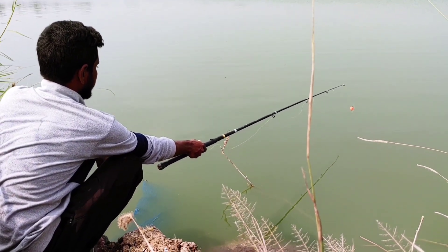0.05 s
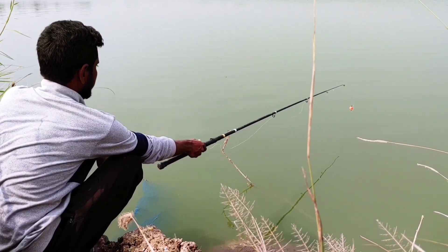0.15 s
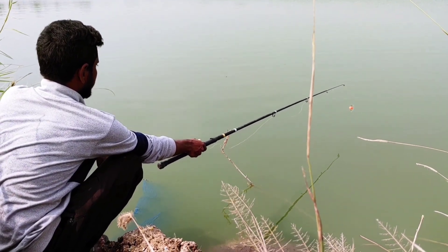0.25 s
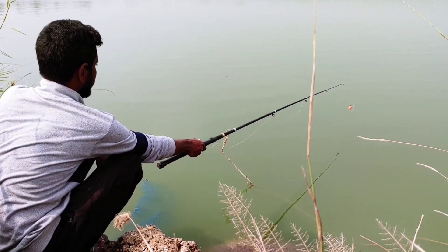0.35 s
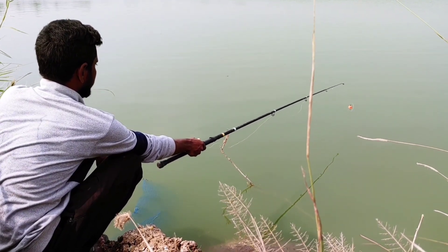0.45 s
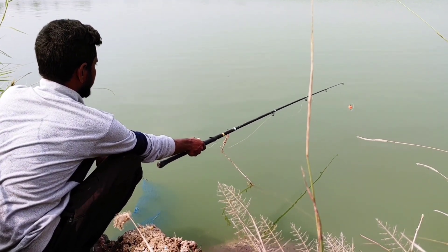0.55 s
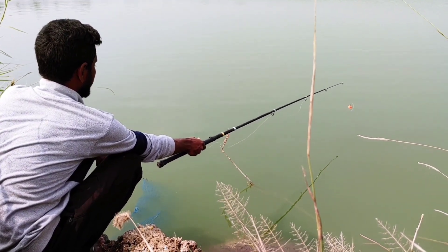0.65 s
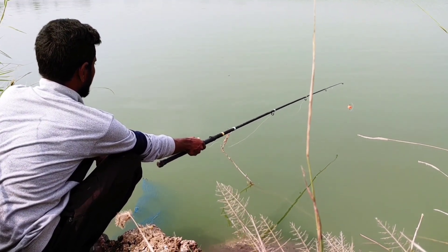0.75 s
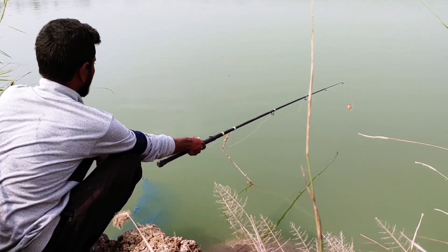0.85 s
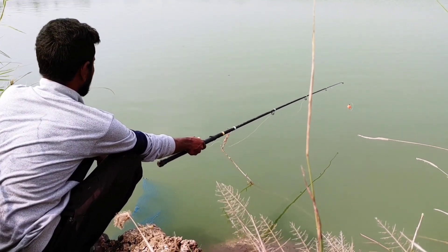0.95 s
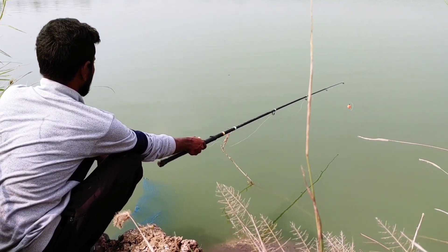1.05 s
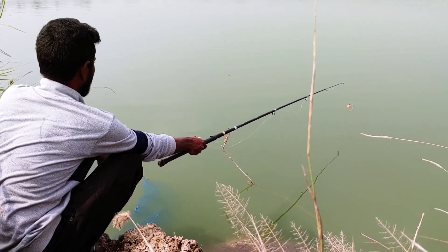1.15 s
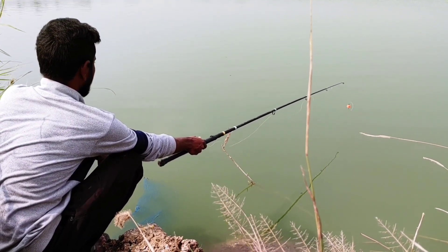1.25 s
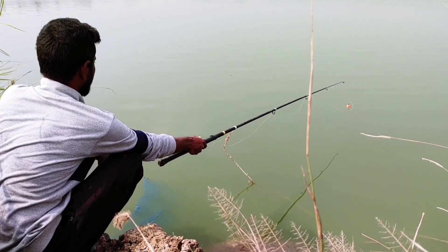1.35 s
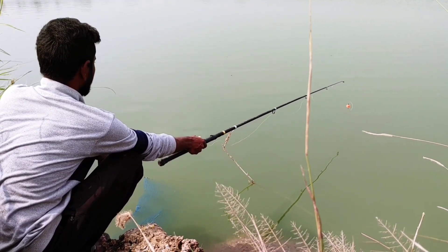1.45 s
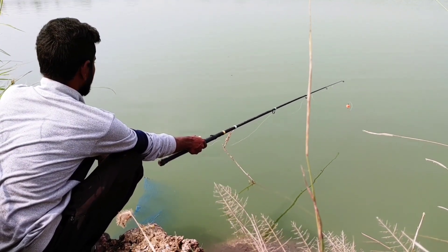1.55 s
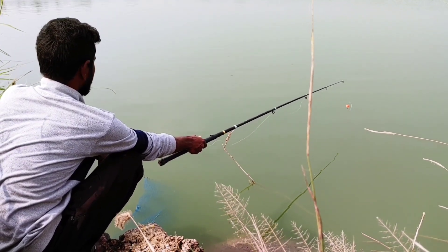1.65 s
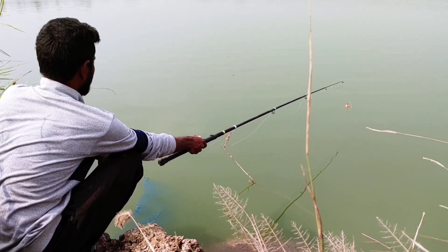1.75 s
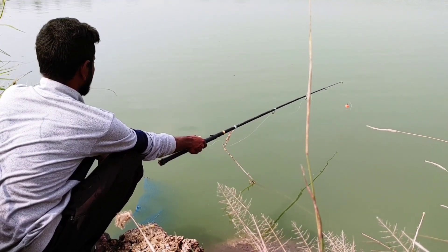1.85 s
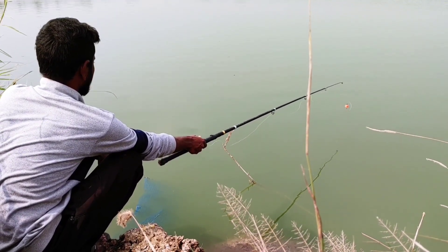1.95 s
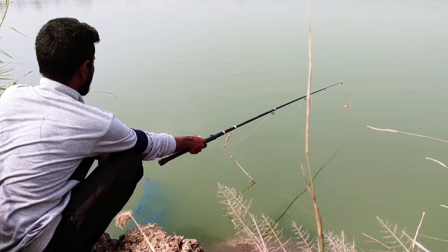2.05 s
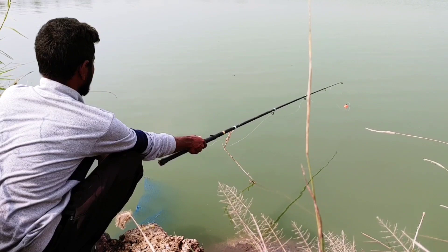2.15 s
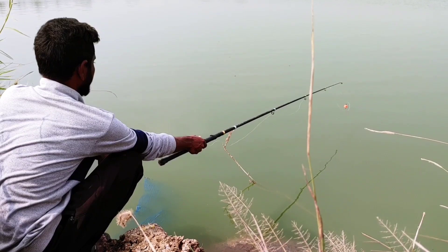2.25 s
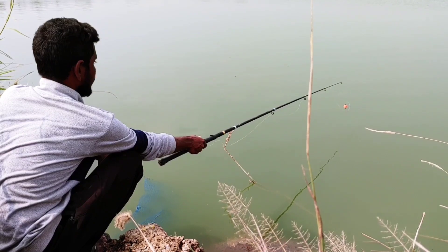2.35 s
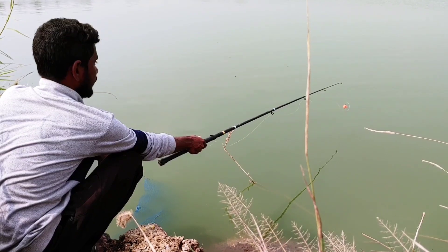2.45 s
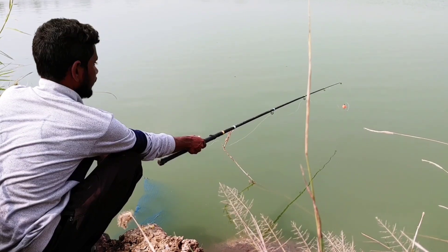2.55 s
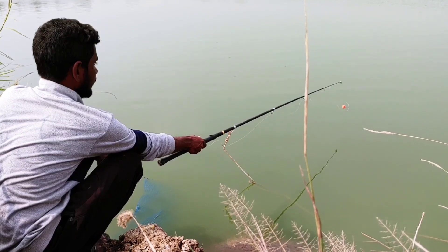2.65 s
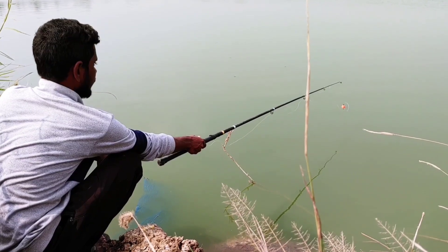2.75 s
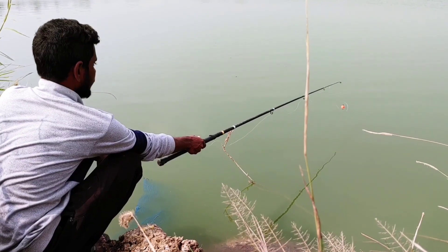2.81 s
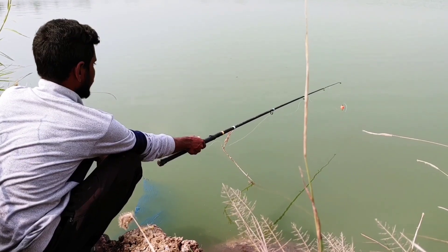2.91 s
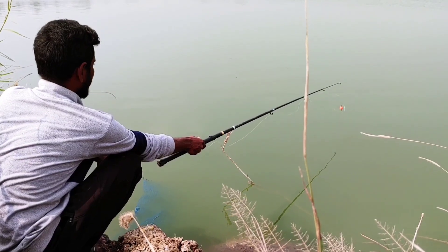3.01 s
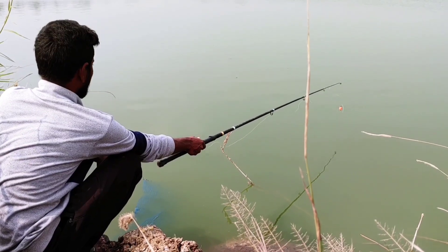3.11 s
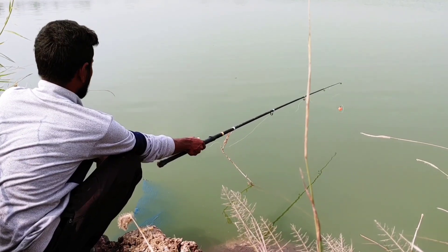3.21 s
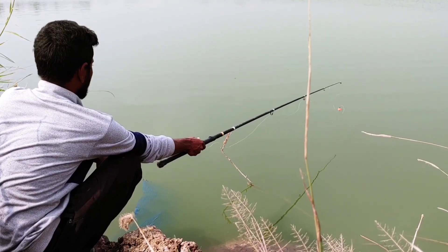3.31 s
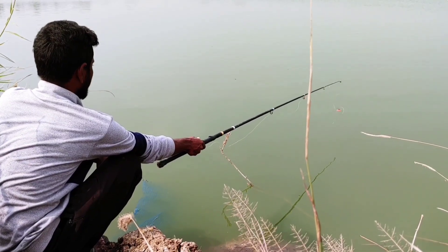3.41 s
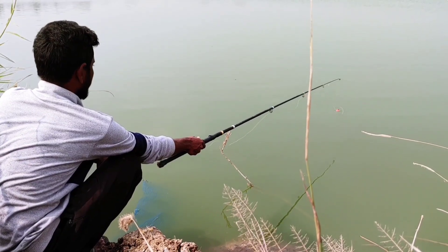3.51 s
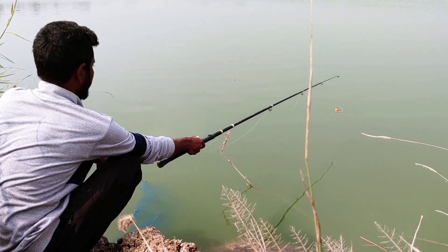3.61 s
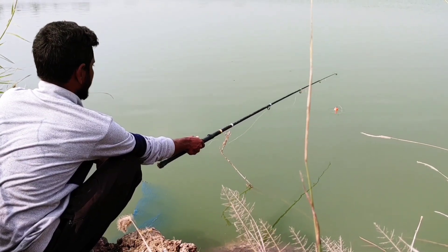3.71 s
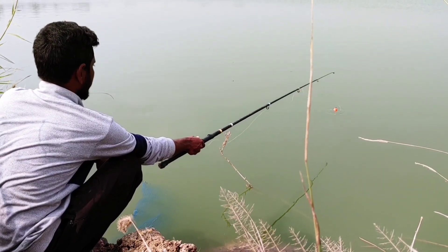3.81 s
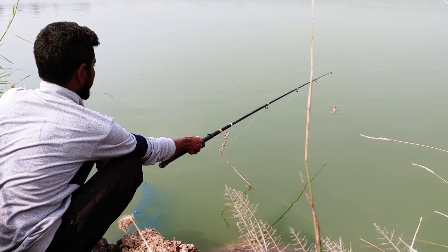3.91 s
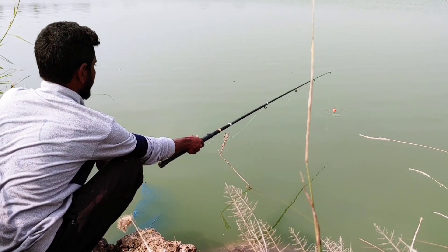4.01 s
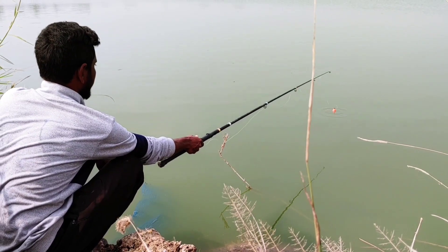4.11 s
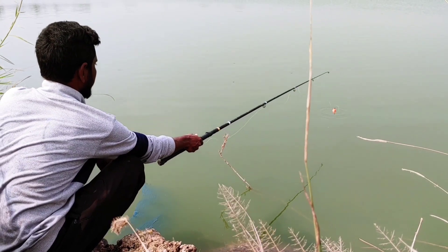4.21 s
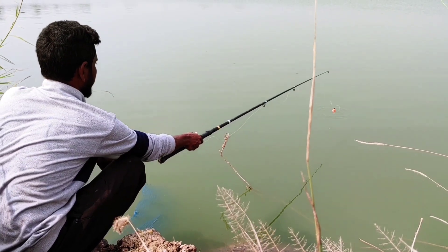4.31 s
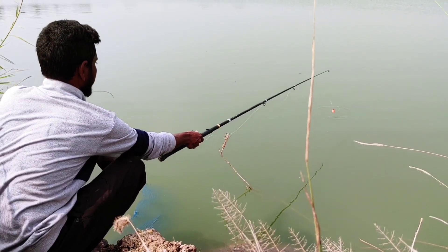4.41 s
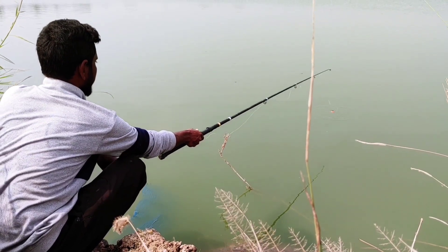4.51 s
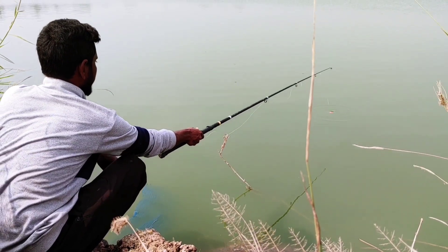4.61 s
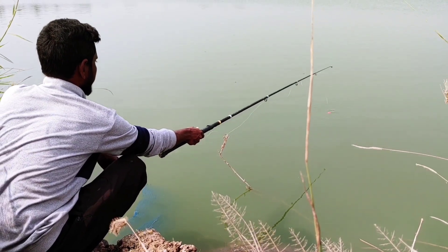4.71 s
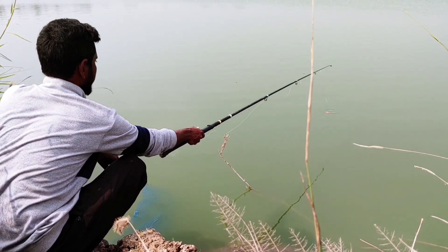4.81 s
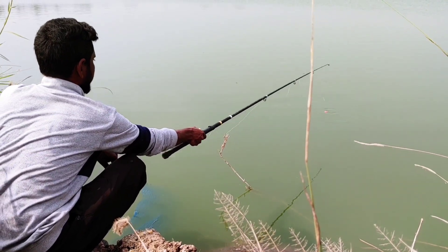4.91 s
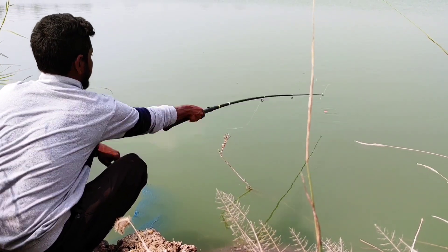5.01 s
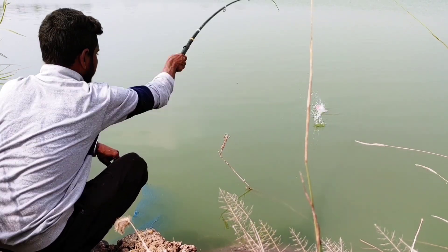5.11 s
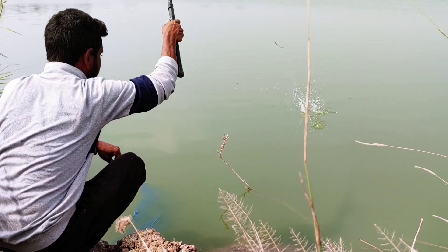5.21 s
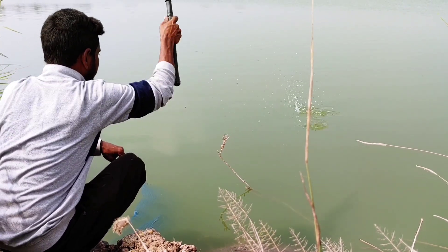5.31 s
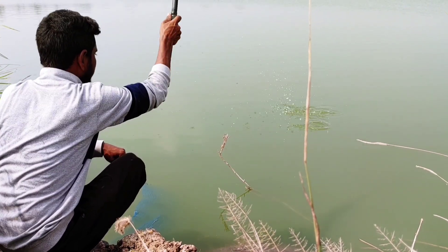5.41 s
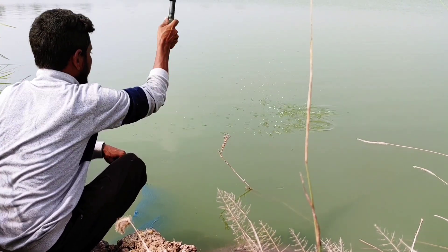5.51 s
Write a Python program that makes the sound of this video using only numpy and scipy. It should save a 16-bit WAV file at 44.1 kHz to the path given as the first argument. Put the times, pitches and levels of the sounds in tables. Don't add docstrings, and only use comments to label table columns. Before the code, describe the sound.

Calm lake edge with low distant rumble, a faint motor hum, soft air hiss and thin bird twitter. Near the bank water slaps sharply, then sloshes again, throwing plinking drops. After the drips thin out, a hooked fish thrashes with loud, crackling spray. Small stereo recorder close to the water, open air, little echo.

```python
import sys
import numpy as np
from scipy import signal
from scipy.fft import rfft, irfft, next_fast_len
from scipy.io import wavfile
from scipy.ndimage import uniform_filter1d, map_coordinates

SR = 44100
rng = np.random.default_rng(int(sys.argv[2]) if len(sys.argv) > 2 else 0)


def elevation(decibels):
    levels = np.asarray(decibels, float)
    return 10 ** (levels / 20)


def master(y):
    cut = np.clip(np.atleast_2d(y).T, -1, 1)
    pcm = np.round(cut * 32767)
    wavfile.write(sys.argv[1], SR, pcm.astype(np.int16))


N = 245240
T = np.arange(N) / SR


def unit(x):
    return x / np.sqrt(np.mean(x ** 2) + 1e-20)


def along(points, hz):
    f, v = np.transpose(points)
    return np.interp(np.log(hz + 1), np.log(f + 1), v)


def filtered(x, response):
    size = next_fast_len(N + 8192)
    return irfft(rfft(x, size) * response(np.fft.rfftfreq(size, 1 / SR)), size)[..., :N]


def equalised(x, points):
    return filtered(x, lambda f: elevation(along(points, f)))


def causal(points):
    cepstrum = irfft(np.log(elevation(along(points, np.fft.rfftfreq(1024, 1 / SR)))))
    cepstrum[1:512] *= 2
    cepstrum[513:] = 0
    return irfft(np.exp(rfft(cepstrum)))[:512]


def wobble(rate):
    knots = rng.standard_normal(int(N * 40 / SR) + 4)
    return map_coordinates(knots, [T * np.clip(rate, 0, 40)])


def rings(s, hz, size, rise, life, attack, length):
    s, hz, size, rise, life = (np.broadcast_to(v, np.shape(s))[:, None] for v in (s, hz, size, rise, life))
    k = np.arange(length)
    age = k / SR / life
    turns = hz * life * (age + (rise - 1) * age * age / 2)
    envelope = size * elevation(-20 * age) * (1 - np.exp(-age / attack)) * np.clip(4 - 1.6 * age, 0, 1)
    wave = envelope * np.sin(2 * np.pi * turns)
    at = np.clip(np.round(s * SR).astype(int) + k, 0, N)
    return np.bincount(at.ravel(), wave.ravel(), N + 1)[:N]


def far_rumble():
    # frequency [Hz], density [dB per Hz].
    rumble_colour = [(15, -37), (30, -14.5), (60, -4), (100, -1.5), (145, -3.5), (185, -3.5), (240, -13),
                     (400, -28.5), (700, -21.5), (1000, -45)]
    a, b = rng.standard_normal((2, N))
    rumble = equalised(np.array([a + 0.028 * b, a - 0.14 * b]), rumble_colour)
    return elevation(-57.5 + 0.3 * wobble(3.3)) * unit(rumble)


def far_pump():
    hz = 145 + 2.1 * wobble(3.7)
    return elevation(-60 + 0.18 * wobble(1.2)) * np.sin(2 * np.pi * np.cumsum(hz) / SR)


def air_hiss():
    # frequency [Hz], density [dB per Hz].
    left_hiss = [(150, -9), (300, 1.5), (700, -6), (2000, -10.5), (2700, -17), (3600, -13.5), (5300, -20),
                 (6200, -19), (7300, -31), (8300, -22.5), (9500, -20), (11700, -19.5), (15200, -17.5),
                 (16300, -50)]
    right_hiss = [(150, 3.5), (300, -1), (700, -1.5), (2000, -12), (2700, -10.5), (3600, -13.5),
                  (5000, -13.5), (6700, -18), (7400, -29), (8300, -24.5), (10200, -11.5), (12500, -17.5),
                  (15200, -17), (16300, -60)]
    a, b = rng.standard_normal((2, N))
    both = np.array([a + 0.95 * b, a - 1.05 * b])
    hiss = filtered(both, lambda f: elevation([along(left_hiss, f), along(right_hiss, f)]))
    return elevation(-59.5 + 0.7 * wobble(2.6)) * unit(hiss)


def background():
    return far_rumble() + far_pump() + air_hiss()


def bird():
    # start [s], pitch [Hz].
    bird_notes = [(.075, 2520), (.13, 2820), (.165, 2690), (.295, 2820), (.33, 2620), (.43, 2470),
                  (.525, 2820), (.81, 2820), (.63, 2780), (.625, 2450), (.38, 2500), (.49, 2880),
                  (.225, 2900), (.36, 2650), (.55, 2850), (.73, 2850), (.93, 2800), (.95, 2600), (.6, 2440),
                  (.68, 2650), (.2, 2920), (.885, 2450), (.905, 2450), (.98, 2800)]
    # start [s], pitch [Hz], peak [dB], life [s], glide [share of pitch].
    whistles = [
        (1.775, 3690, -67, .079, 0),
        (4.09, 1440, -73, .27, 0),
        (2.292, 2050, -54, .04, -.08),
        (2.52, 2020, -61, .06, -.08),
    ]
    note_db, note_s = -71, 0.033
    luck = rng.uniform(0, 1, (3, 140))
    twitter_hz = 2400 + 600 * luck[1]
    song = rings(0.074 + luck[0], twitter_hz, elevation(-64.5), 0.76 + 0.235 * luck[2], 0.0113, 0.24, 1200)
    warble = np.cumsum(1 + 0.012 * wobble(40)) / SR
    for s, hz, db, life, glide in [(s, hz, note_db, note_s, 0) for s, hz in bird_notes] + whistles:
        envelope = np.sin(np.pi * np.clip((T - s) / life, 0, 1)) ** 0.11
        turns = hz * (warble + glide * (T - s) ** 2 / life / 2)
        song += elevation(db) * envelope * np.sin(2 * np.pi * turns)
    song *= elevation(3 * wobble(38))
    t = np.arange(SR // 4) / SR
    haze = rng.standard_normal((2, len(t))) * elevation(-60 * t / 0.1)
    far = signal.fftconvolve(song[None], haze / np.linalg.norm(haze[0]), axes=1)[:, :N]
    return (song + elevation(-3) * far) * elevation([[-4], [3]])


def grains(count, hz, spread, cycles, uneven_db, length, noise):
    out = []
    for _ in range(2):
        pitch = np.clip(hz * np.exp(spread * rng.standard_normal(count)), 120, 15000)
        size = elevation(uneven_db * np.minimum(rng.exponential(1, count), 3)) * rng.choice([-1, 1], count)
        shower = rings(rng.uniform(0, N / SR, count), pitch, size, 1.183, cycles / pitch, 0.071, length)
        hiss = filtered(rng.standard_normal(N), lambda f: np.exp(-(np.log((f + 1) / hz) / spread / 2) ** 2))
        out.append(unit(unit(shower) + noise * unit(hiss)))
    return np.array(out)


def churn(rows, swell, water, trim_db):
    s, db, hold, depth = np.transpose(rows)[:, :, None]
    rise, fall = swell
    shape_db = db - rise * np.maximum(s - T, 0) - fall * np.maximum(T - s - hold, 0)
    depth_shares = (0, 0.48, 1)
    shared_db = 2.46 * wobble(39)
    out = 0
    for layer, share, trim in zip(water, depth_shares, trim_db):
        level = np.sqrt(elevation(2 * (shape_db + share * depth)).sum(0))
        out = out + layer * level * elevation(trim + shared_db + 1.7 * wobble(25))
    return out


def drops(rows, water, ring_hz, lighter_higher, tick_db, ring_db, spatter_db, body_db):
    spray, chatter, _ = water
    s, db, body, t60 = np.transpose(rows)
    hz = ring_hz * np.exp(0.061 * rng.standard_normal(len(s)) - lighter_higher * body)
    ring = rings(s, hz, elevation(db + ring_db), 1.007, 12 / hz, 0.64, 300)
    tick = elevation(db + tick_db) * np.minimum(0.031 / t60, 1)
    ring += rings(s, 9300, tick, 1.3, 0.0002, 0.083, 60)
    lead = SR // 50
    t = np.arange(-lead, SR // 4) / SR - 0.0012
    fine, coarse = np.zeros(N + SR), np.zeros(N + SR)
    for at, level, low, decay in zip(s, db, body, t60):
        shape = elevation(-60 * np.abs(t) / max(decay, 0.003) / np.where(t < 0, 0.25, 1))
        span = slice(round(at * SR) - lead, round(at * SR) - lead + len(t))
        fine[span] += elevation(2 * (level + spatter_db)) * shape ** 2
        coarse[span] += elevation(2 * (level + low + body_db)) * shape
    return ring * np.c_[[1, 0.4]] + spray * np.sqrt(fine[:N]) + chatter * np.sqrt(coarse[:N])


def bubbles(rows):
    s, hz, db, life = np.transpose(rows)
    rise = 1.1 - 0.0414 * np.log2(hz / 400)
    return rings(s, hz, elevation(db + 4), rise, life, 0.059, 9000)


def snaps(rows, top_db):
    out, t = np.zeros((2, N)), np.arange(SR // 100) / SR
    for s, db in rows:
        out[:, round(s * SR):][:, :len(t)] += elevation(db - 60 * t / 0.0092) * rng.standard_normal((2, len(t)))
    return equalised(out, [(3000, -13.5), (7000, 2.5), (13000, 4.5), (16000, top_db)])


def drips(rows):
    s, db, hz = np.transpose(rows)
    plink = rings(s, hz, elevation(db + 3.5), 1.08, 6.7 / hz, 0.27, 300)
    click = rings(s, 6000, elevation(db - 2), 1.05, 0.0003, 0.1, 60)
    tick = rings(s, 11800, elevation(db - 3), 1.05, 0.0006, 0.1, 100)
    return plink + click + tick


def ports(pair, lag, alike):
    # frequency [Hz], gain [dB].
    left_colour = [(200, -1.5), (1500, -6.5), (3500, -4.5), (4400, -1.5), (5200, -13.5), (6300, -9),
                   (8000, -10.5), (9600, -5), (11000, -9), (13500, -18), (15600, -11)]
    right_colour = [(200, 1.5), (3500, -5.5), (4800, 5), (5900, -1), (6500, 0), (7300, -6), (9200, -2.5),
                    (10400, 7), (11700, 0.5), (13500, -7), (15600, -13)]
    share = lambda f: np.clip(along(alike, f), 0, 1)
    left = filtered(pair[0], lambda f: share(f) * np.exp(-2j * np.pi * f * lag / SR))
    left = left + filtered(pair[1], lambda f: np.sqrt(1 - share(f) ** 2))
    heard = ((left, left_colour), (pair[0], right_colour))
    return np.array([signal.fftconvolve(x, causal(colour))[:N] for x, colour in heard])


def bank_splash(water):
    # start [s], spray level [dB], hold [s], depth [dB of heavy water].
    bank_surges = [(.385, -63.5, .04, 6), (.43, -68, .003, -12), (.452, -62, 0.0035, 6.5),
                   (1.25, -65.5, .004, 2), (1.83, -56, .02, -16), (1.865, -40, 0.039, 3.5),
                   (1.93, -46, 0.048, -11), (2.0, -45.5, 0.071, -4), (2.16, -41.5, 0.015, -30),
                   (2.24, -43.5, 0.053, -6), (2.37, -50.5, 0.29, -12), (2.74, -57, 0.11, -14),
                   (3.03, -42, 0.013, -9), (3.18, -46, 0.092, -1.5), (3.27, -47.5, 0.25, 2),
                   (3.53, -42, 0.098, -15), (3.72, -53, 0.062, -10.5), (3.86, -53.5, 0.049, -12),
                   (3.96, -57, 0.2, -9), (4.17, -48, 0.026, -13.5), (4.35, -55.5, 0.046, -12),
                   (4.5, -64, 0.66, -6)]
    # time [s], peak [dB], body [dB], spatter decay by 60 dB
    # [s].
    bank_drops = [(1.8322, -50, -19, 0.043), (1.8583, -18, -34, 0.28), (1.8657, -20.5, 11, 0.044),
                  (1.8761, -15.5, -2, 0.089), (1.8894, -20, 8, 0.02), (2.1345, -44, -22, .02),
                  (2.146, -26, 4, 0.13), (2.1945, -27.5, 11.5, 0.078), (2.2445, -35.5, 14.5, 0.14),
                  (2.2697, -17.5, -2, 0.051), (2.2786, -20, 2, 0.029), (2.408, -40, -19, 0.055),
                  (2.4443, -36, 12, 0.029), (2.474, -43, 12, 0.24), (2.5467, -42, -17, .075),
                  (2.5772, -56, -15, .013), (2.6597, -28, 3, 0.009), (2.6726, -30, -9, 0.0039),
                  (2.7061, -25, -3, 0.004),
                  (3.0077, -27, -14, .01), (3.0198, -20, -20, 0.028), (3.0246, -10.5, -30, 0.03),
                   (3.025, -29, 0, 0.07), (3.0721, -44, -22, 0.015), (3.1185, -39, 8, 0.026),
                   (3.1467, -33.5, 8, 0.018), (3.179, -34.5, 15, 0.069), (3.2382, -20.5, -10, 0.032),
                   (3.2696, -30, -2, .044), (3.2858, -17.5, 2.5, 0.02), (3.2934, -16.5, -0.5, 0.033),
                   (3.3022, -23.5, -15, .041), (3.337, -30, -2, 0.1), (3.375, -25, 10, 0.0094),
                   (3.4338, -27, -3, 0.17), (3.5274, -29.5, -4, 0.04), (3.6019, -27.5, -27, 0.036),
                   (3.6463, -18.5, -13, 0.0037), (3.7183, -37, -41, 0.017), (3.856, -33.5, -27, 0.013),
                   (3.996, -38.5, -27, 0.066), (4.1794, -42, -12, 0.11), (4.2114, -44, -11, 0.046),
                   (4.338, -33.5, -2, 0.096), (4.3523, -47, -10, .09), (4.6024, -54, -11, .019)]
    # start
    # [s], starting pitch [Hz], peak [dB], life [s].
    bank_bubbles = [(1.36, 616, -48, 0.018), (1.819, 267, -52, 0.11), (1.862, 923, -30.5, 0.019),
                    (1.866, 696, -33, 0.026), (1.868, 314, -41, 0.078), (1.888, 547, -30, 0.013),
                    (1.894, 313, -29, 0.014), (1.912, 282, -32, 0.0075), (1.93, 359, -44, 0.039),
                    (1.965, 390, -43.5, 0.031), (1.97, 690, -38.5, .012), (2.008, 508, -45, 0.023),
                    (2.206, 680, -44, 0.014), (2.241, 1500, -44, .014), (2.276, 2310, -32, 0.011),
                    (3.112, 400, -42.5, 0.028), (3.146, 702, -41.5, 0.024), (3.166, 1180, -35, 0.011),
                    (3.183, 298, -36.5, 0.0091), (3.188, 188.5, -47.5, 0.089), (3.288, 1023, -40, 0.026),
                    (3.292, 2200, -29.5, 0.01), (3.34, 800, -36.5, .0096), (3.377, 625, -36.5, 0.02),
                    (3.388, 368, -47.5, .051), (3.492, 245, -41, 0.015), (3.504, 265, -47.5, 0.18),
                    (3.543, 370, -43.5, 0.045), (3.243, 266, -41.5, 0.019), (2.1945, 4580, -33, 0.0018),
                    (2.196, 3700, -34, 0.0023), (3.1178, 4900, -43, .002), (3.2395, 5300, -32, .0015),
                    (3.2405, 3300, -38, .001), (2.09, 2500, -41, 0.006), (2.013, 2200, -39, .003),
                    (3.57, 299, -47, 0.046), (3.61, 336, -49, 0.032), (3.717, 2690, -45, 0.0044),
                    (3.64, 2200, -41, .006), (4.35, 738, -51, 0.03)]
    # time [s], peak [dB].
    bank_snaps = [
        (1.803, -43),
        (1.8655, -17),
        (2.1345, -36),
        (2.476, -32.5),
        (2.578, -34),
        (2.765, -39.5),
        (3.009, -23),
    ]
    # time [s], peak [dB].
    crack = [
        (3.2412, -26),
    ]
    # time [s], peak [dB], pitch [Hz].
    bank_drips = [(0.452, -44, 2440), (2.0023, -28, 2220), (2.022, -38, 4860), (2.193, -38, 4750),
                  (2.2576, -29, 4750), (2.3234, -47, 4520), (2.357, -40, 4200), (2.4124, -36, 4250),
                  (2.4443, -41, 2060), (2.489, -40, 4370), (2.548, -43, 4480), (2.5614, -49, 4800),
                  (2.6364, -53, 4660), (2.6453, -44, 4360), (2.7114, -38, 4620), (3.1183, -38, 5170),
                  (3.1467, -38, 5200), (3.1647, -36, 5000), (3.2184, -43, 4210), (3.2375, -39, 4730),
                  (3.2862, -29, 4630), (3.4111, -35, 4800), (3.4334, -27, 4350), (3.4994, -40, 4660),
                  (3.5084, -35, 4760), (3.5402, -28, 4500), (3.5768, -30, 4770), (3.718, -43, 4260),
                  (3.8568, -41, 4810), (3.9469, -53, 5100), (3.9923, -46, 5230), (4.0193, -54, 4660),
                  (4.0956, -48, 4370), (4.1514, -40, 5940), (4.2044, -44, 2040), (4.2113, -43, 5180),
                  (4.338, -46, 4860), (4.5024, -62, 4210),
                  (1.864, -26, 4770),
        (1.8731, -21, 4830),
        (1.9004, -35, 4900),
        (2.2707, -28.5, 4700),
        (2.28, -30, 2320),
        (3.6004, -31, 4410),
    ]
    splash = churn(bank_surges, (460, 182), water, trim_db=(-2, 0.1, -5))
    splash = splash + drops(bank_drops, water, ring_hz=4570, lighter_higher=0.0018,
                            tick_db=-17, ring_db=1.0, spatter_db=-15.0, body_db=-22.5)
    splash = equalised(splash, [(2400, 0), (3500, -1.0), (4700, 2.0), (5800, -1), (7000, -1), (9500, -1.5),
                                (12800, 3.0), (14200, -6), (15300, -9), (15800, -40)])
    top = filtered(splash, lambda f: np.clip((f - 7000) / 2000, 0, 1))
    splash = splash + top * (elevation(-3.5) - 1) * (T > 3.1)
    splash = splash + bubbles(bank_bubbles) + drips(bank_drips)
    splash = splash + snaps(bank_snaps, top_db=-6) + snaps(crack, top_db=22)
    return ports(splash, lag=17.5, alike=[(300, 0.88), (1500, 0.53), (4000, 0.037), (12000, 0.19)])


def fish_thrash(water):
    # start [s], spray level [dB], hold [s], depth [dB of heavy water].
    fish_surges = [
        (4.93, -60, 0.09, -15),
        (5.03, -49, 0.0087, -6),
        (5.065, -33.5, 0.038, -11),
        (5.13, -43.5, 0.043, -3),
        (5.19, -44.5, 0.074, -10.5),
        (5.27, -36.5, 0.036, -16),
        (5.305, -32.5, 0.015, -53),
        (5.345, -49, 0.04, -4),
        (5.4, -46.5, 0.047, -14),
        (5.48, -44.5, .08, -10.5),
    ]
    # time [s], peak [dB], body [dB], spatter decay by 60 dB [s].
    fish_drops = [(4.9975, -28, -22, 0.074), (5.0151, -21.5, -17, 0.046), (5.0493, -31, -6, .076),
                  (5.0687, -8, -6, 0.1), (5.0719, -9, 4, 0.064), (5.0754, -8, -6, 0.065),
                  (5.092, -9, -28, 0.088), (5.1477, -14.5, -31.5, 0.087), (5.1527, -6.5, -27, 0.0092),
                  (5.24, -28, -8, 0.11), (5.2884, -12.5, -10, 0.027), (5.3013, -11.5, -34, 0.033),
                  (5.3118, -30, -36, .03), (5.3224, -19.5, -28, 0.037), (5.3418, -19, -3.5, 0.074),
                  (5.352, -8.5, -26, 0.1), (5.3588, -2.5, -48, 0.0088), (5.3615, -8.5, -29, 0.03),
                  (5.3991, -23, -24, 0.037), (5.4195, -17.5, -20, 0.058), (5.437, -26, -22, 0.041),
                  (5.458, -21, -29, 0.027), (5.5089, -27, -16, 0.077), (5.5269, -14.5, -17, 0.063),
                  (5.5514, -34, -17, .05)]
    # start [s], starting pitch [Hz], peak [dB], life [s].
    fish_bubbles = [(5.063, 1810, -24, 0.0069), (5.07, 620, -41, 0.02), (5.25, 5410, -39, 0.023),
                    (5.268, 5630, -38, .012), (5.07, 3000, -26, .004), (5.085, 2900, -28, .004),
                    (5.073, 230, -35.5, 0.021), (5.083, 968, -23.5, 0.016), (5.092, 1940, -26.5, 0.019),
                    (5.125, 1074, -36, 0.013), (5.15, 1120, -25, 0.008), (5.137, 1140, -40, .01),
                    (5.18, 1830, -26, 0.0054), (5.186, 1600, -25, .005), (5.29, 2440, -42, 0.045),
                    (5.335, 200, -44, 0.027), (5.351, 1010, -38, 0.022), (5.3588, 6540, -15, 0.0026),
                    (5.361, 6500, -11.5, 0.0061), (5.369, 5000, -19, .002)]
    # time [s], peak [dB].
    fish_snaps = [
        (5.015, -25.5),
        (5.1515, -10),
        (5.352, -6.5),
        (5.3602, -15),
        (5.3618, -8),
    ]
    # time [s], peak [dB], pitch [Hz].
    fish_drips = [(4.9966, -34, 6030), (5.0689, -22, 5310), (5.0688, -13, 5160), (5.078, -13, 5280),
                  (5.0934, -16, 5130), (5.242, -32, 4570), (5.2884, -25, 4760), (5.3124, -33, 4770),
                  (5.419, -25, 4960), (5.4354, -28, 4720), (5.4585, -38, 5460), (5.5089, -31, 6020),
                  (5.5273, -29, 5850), (5.5504, -38, 5440)]
    thrash = churn(fish_surges, (590, 1400), water, trim_db=(-3, -1.5, -5))
    thrash = thrash + drops(fish_drops, water, ring_hz=4900, lighter_higher=0.0078,
                            tick_db=3.5, ring_db=1, spatter_db=-14.0, body_db=-18.5)
    thrash = equalised(thrash, [(7000, -0.04), (9500, -0.4), (15200, 1.5), (15800, -30)])
    thrash = thrash + bubbles(fish_bubbles) + snaps(fish_snaps, top_db=10) + drips(fish_drips)
    return ports(thrash, lag=-6.5, alike=[(300, 0.78), (1000, 0.6), (4000, 0.064), (12000, 0.57)])


def scene():
    spray = grains(count=6000, hz=6598, spread=0.549, cycles=19.4, uneven_db=3.0, length=200, noise=1.0)
    chatter = grains(count=4000, hz=1729, spread=0.4405, cycles=8.1, uneven_db=2.5, length=330, noise=1.0)
    slosh = grains(count=1100, hz=400, spread=0.46, cycles=4.9, uneven_db=-2.5, length=800, noise=0.6)
    water = (spray, chatter, slosh)
    return background() + bird() + bank_splash(water) + fish_thrash(water)


def dropouts(x):
    # frequency [Hz], threshold [spreads of the random field].
    rarity = [(900, 3), (1800, 2.3), (3200, 2.3), (5000, 2.3), (7500, .9), (10000, 2.4), (14500, .8),
              (15300, .5), (15700, -.5)]
    # start [s], end [s], centre [Hz], width [Hz].
    muted_bands = [(1.865, 2.03, 3290, 250), (2.05, 2.09, 3290, 250), (2.14, 2.21, 3290, 250),
                   (2.25, 2.275, 3290, 200), (2.275, 2.3, 3550, 200), (2.445, 2.51, 3290, 250),
                   (2.65, 2.675, 3290, 250), (3.21, 3.232, 3400, 250), (3.46, 3.55, 3290, 200),
                   (1.87, 1.93, 2715, 170), (1.985, 2.095, 2715, 200), (2.145, 2.27, 2715, 170),
                   (1.91, 1.97, 1720, 170), (2.18, 2.23, 1800, 130), (5.31, 5.34, 2800, 300),
                   (5.3, 5.325, 2100, 250), (5.17, 5.22, 7500, 500), (5.41, 5.44, 7200, 350),
                   (5.42, 5.45, 3500, 200)]
    hz, t, z = signal.stft(x, SR, nperseg=512)
    patches = uniform_filter1d(rng.standard_normal(z.shape[1:]), 3, 0)
    field = unit(uniform_filter1d(patches, 14, 1))
    gain_db = np.where(field < -along(rarity, hz)[:, None], -40, 1.8 * field * (hz[:, None] > 900))
    patchy = signal.istft(z * elevation(gain_db), SR, nperseg=512)[1][:, :N]
    hz, t, z = signal.stft(patchy, SR, nperseg=1024, noverlap=896)
    for start, end, centre, width in muted_bands:
        in_band = np.abs(hz - centre) < width / 2 + 45
        z = z * (1 - in_band[:, None] * (t > start) * (t < end))
    return signal.istft(z, SR, nperseg=1024, noverlap=896)[1][:, :N]


def band_limit(x):
    return signal.sosfilt(signal.butter(12, 16820, fs=SR, output="sos"), x)


def record(dry):
    kept = equalised(dry, [(15600, -0.5), (15900, -9), (16300, -27), (16800, -29)])
    rounded = 0.78 * np.tanh(dropouts(kept) / 0.82)
    return band_limit(rounded - 0.0032)


dry = scene()
out = record(dry)
master(out)
```